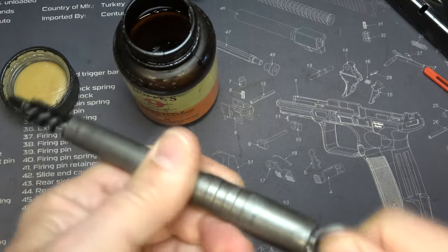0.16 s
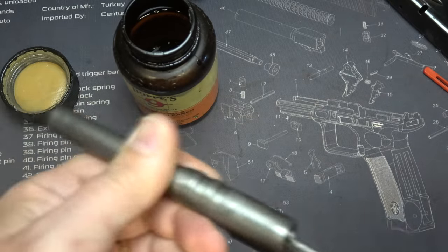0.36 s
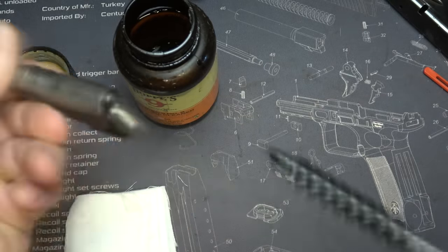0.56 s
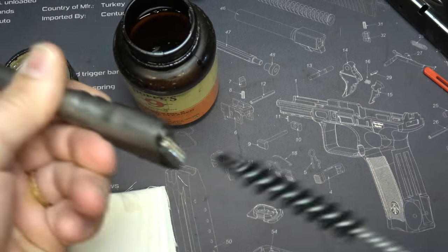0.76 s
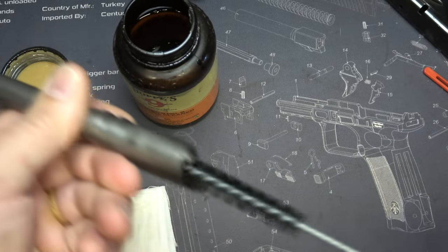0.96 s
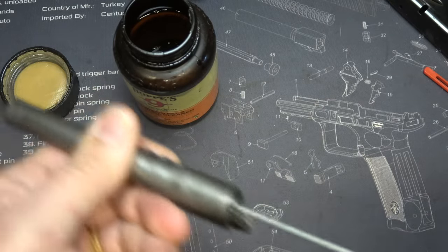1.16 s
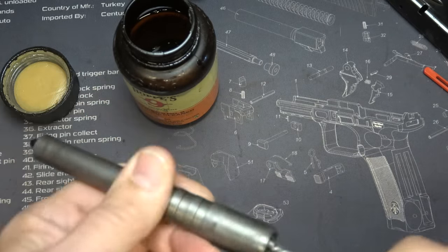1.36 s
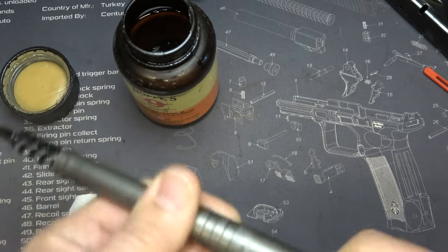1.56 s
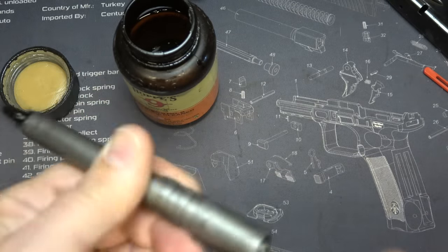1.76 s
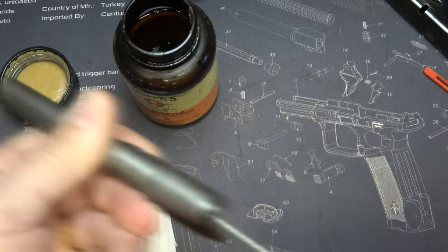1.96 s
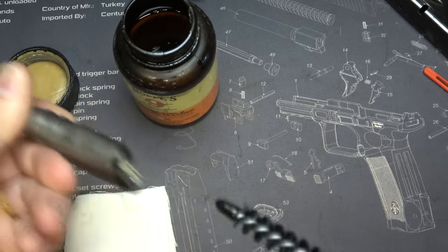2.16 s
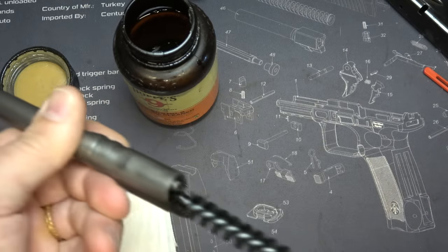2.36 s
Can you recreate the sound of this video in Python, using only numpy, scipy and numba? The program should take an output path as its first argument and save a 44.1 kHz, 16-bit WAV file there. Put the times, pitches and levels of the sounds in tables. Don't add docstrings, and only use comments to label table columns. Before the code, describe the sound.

A wet bristle brush scrubs inside a small steel tube, close and dry. Bright, gritty rasps with a hollow pipe tone come at 0.23 and 0.47 seconds, the second ending in a pop. A softer, slower push runs from 1.03 to 1.35, then a short hard knock at 1.5. A quick tug at 1.75 and longer pull from 1.9 end with a squeaky pop at 2.1. Quiet room hum remains.

```python
import sys
import numpy as np
from scipy import signal
from scipy.fft import rfft, irfft
from scipy.io import wavfile
from scipy.ndimage import uniform_filter1d
from numba import njit

SR = 44100
rng = np.random.default_rng(int(sys.argv[2]) if len(sys.argv) > 2 else 0)


def unload_audio(sound):
    columns = np.transpose(np.atleast_2d(sound))
    steps = np.round(np.clip(columns, -1, 1) * 32767)
    wavfile.write(sys.argv[1], SR, steps.astype(np.int16))


def attenuation_scalar(level_db):
    decades = np.asarray(level_db, float) / 20
    return 10 ** decades


N = 105840

# time_s, rubbing_db, air_drive_db, steel_lean_db
FIRST_PULL = [
    [(0.233, -24.5, -24, -6), (0.245, -21, -35, -9), (0.257, -25, -26, -7), (0.267, -24.5, -11, -2.5),
     (0.281, -22.5, -19.5, -12), (0.3, -26.5, -17, -7), (0.312, -29, -13.5, -4), (0.344, -31.5, -8, 0)],
    [(0.466, -32.5, -10.5, -31), (0.475, -29.5, -11.5, -21), (0.49, -27.5, -25, -7),
     (0.515, -26, -24.5, -14), (0.526, -24, -11, -22), (0.54, -21.5, -20, -18.5), (0.549, -19.5, -22, -26),
     (0.556, -24.5, -23.5, -19.5)],
]
PUSH = [
    [(1.034, -52, -19.5, -3), (1.098, -38, -27, -14), (1.12, -33.5, -31, -18), (1.15, -33.5, -23, -11),
     (1.2, -34.5, -6, -16), (1.243, -34, -22.5, -15), (1.255, -30.5, -26, -17), (1.322, -31, -25, -13.5),
     (1.352, -37.5, -12.5, -9.5)],
    [(1.485, -33, -0.5, -10), (1.509, -35, -28, -2.5), (1.527, -24, -15.5, 7.5), (1.537, -24.5, -4.5, 5),
     (1.547, -30, -1.5, 3)],
]
SECOND_PULL = [
    [(1.753, -31.5, -38, 6), (1.765, -23, -32, 5), (1.775, -23.5, -12, -16), (1.801, -29, -12, -2),
     (1.832, -28.5, -13.5, -19.5)],
    [(1.908, -31, -12.5, -18), (1.942, -27.5, -6, -4.5), (1.956, -25.5, -26, 0.5), (1.99, -26.5, -15, -4.5),
     (2.005, -29, -20, -21), (2.03, -27, -10.5, -29), (2.055, -29, -18, -29), (2.088, -22, -20.5, -27.5),
     (2.118, -41.5, -4, -4)],
]
STROKES = FIRST_PULL + PUSH + SECOND_PULL
GRIP_STARTS = [.232, .4655, 1.033, 1.4845, 1.752, 1.9075]
# quick_fall_db_per_s, rustle_start_db, rustle_fall_db_per_s
SETTLING = [(2500, -14, 497), (1570, -11, 447), (2000, -13, 491.5), (2070, -10, 451), (3500, -18.5, 293.5),
            (2030, -7.5, 452)]
# time_s, air_column_hz, second_mode_db, hiss_focus_db_per_octave,
# lowest_steel_mode_up_others_down_db
TRAVEL = [(.1, 1240, -2, -12.5, -2), (.23, 1340, 11, -1.5, -9), (.29, 1176, 1, -2, 0),
          (.31, 1310, -3, -4.5, 8), (.47, 1283, -13, -1, -5), (.51, 1380, -8, 4.5, 6),
          (.522, 1400, -8, 10, 7), (.546, 1386, -6, 6.5, -3.5), (.554, 1435, -16, -1, 0),
          (1.03, 1425, 15, 2, 6), (1.16, 1390, -3, 11.5, 2), (1.22, 1276, -12.5, 5.5, -7),
          (1.36, 1333, 5, 5, -8), (1.5, 1247, -17, 2, 4.5), (1.55, 1413, 2.5, -7.5, 4),
          (1.76, 1343, -1, -2.5, -6), (1.94, 1290, -5.5, 0.5, -7), (1.99, 1405, -8, 6.5, 6),
          (2.05, 1385, -6, 11, -17), (2.12, 1384, 4.5, -2.5, -2)]
# frequency_hz, density_db
BRISTLE_SPECTRUM = [(410, -37.5), (700, -16), (1250, -14.5), (1630, -8), (2520, -5), (8860, 3), (14300, -3),
                    (15900, -29.5), (16500, -44)]
# frequency_hz, level_db
LOW_STEEL = [(4490, -11.5), (4830, -9.5), (5010, -10.5)]
HIGH_STEEL = [(6240, -14), (6750, -14), (7400, -15), (7670, -12), (8580, -12), (9000, -11), (9550, -12),
              (10300, -13), (10900, -13), (11500, -15), (12200, -15), (13300, -17)]
# start_s, stop_s, frequency_hz, level_over_rubbing_db
SINGING = [(.233, 0.27, 8900, -11), (.233, .26, 2850, -14), (0.22, .285, 2520, -16),
           (.275, .305, 2100, -10), (.25, 0.26, 7300, -0.5), (0.47, 0.58, 2560, -15.5),
           (.535, 0.63, 2840, -15.5), (0.55, 0.51, 7400, -13.5), (1.034, 1.12, 3000, -14.5),
           (1.034, 1.09, 4650, -11), (1.1, 1.3, 2800, -19), (1.15, 1.28, 2500, -20),
           (0.25, .345, 4760, -10.5), (0.2375, 0.33, 5280, -8.5), (1.1, 1.2, 4650, -14.5),
           (1.24, 1.35, 5000, -15.5), (.5, .55, 1420, -21), (0.46, 0.5, 4900, -14.5),
           (1.105, 1.2, 9350, -3), (1.12, 1.24, 10400, -8.5), (0.98, 1.17, 6000, -16),
           (1.21, 1.3, 6000, -12), (1.25, 1.355, 9050, -7), (1.28, 0.98, 7440, -11),
           (1.752, 1.85, 5400, -6.5), (1.91, 1.94, 2040, -11), (1.94, 2.1, 2500, -21),
           (1.93, 1.96, 4100, -16), (1.968, 1.995, 5400, -8.5), (2.02, 2.06, 2550, -19),
           (1.9, 2.075, 3400, -11), (2.025, 2.1, 7000, -4.5), (1.93, 1.98, 8600, -12.5)]
# start_s, level_db, length_s
LONE_SLIPS = [(.002, -64, 0.037), (0.087, -60, 0.0082), (0.257, -26, .0012), (0.152, -64, 0.008),
              (0.184, -59, 0.0076), (.1995, -48.5, 0.0087), (0.212, -48.5, 0.01), (0.4299, -31.5, 0.0067),
              (0.442, -52.5, .018), (1.037, -62, 0.0038), (1.053, -47, 0.0051), (1.065, -50, 0.0036),
              (1.428, -38, 0.0039), (1.536, -25.5, 0.00065), (1.5436, -33, 0.00061), (1.544, -19, 0.00048),
              (1.687, -54.5, 0.031), (1.712, -42.5, 0.007)]
POPS = [(.559, 1450, .07), (.558, 2772, .036), (.558, 4242, .045), (2.103, 2795, .025), (2.118, 2795, .09),
        (2.112, 5700, .025), (1.5425, 1330, .014), (1.536, 1000, .035), (1.53, 850, .045),
        (1.536, 1400, .015), (1.352, 2100, .02), (1.35, 1000, .03), (1.429, 2080, .02), (1.429, 1400, .025),
        (2.385, 4550, .04), (.975, 4700, .05)]
POP_LEVELS = [-21, -32.5, -34, -21, -39, -29.5, -8.5, -23.5, -26.5, -20, -34.5, -37.5, -35.5, -33, -64, -66]
# start_s, level_db, pitch_hz
JOLTS = [(0.235, -34.5, 200), (.432, -39, 230), (.47, -32, 220), (1.54, -35, 531), (1.542, -36.5, 333),
         (1.546, -32, 110), (1.757, -39, 200), (1.913, -33.5, 359), (1.922, -31, 196)]
# middle_s, length_s,
# pitch_hz, level_db
SQUEAKS = [(1.276, 0.013, 729, -38.5), (1.317, 0.045, 400, -43.5), (1.318, 0.017, 838, -47),
           (2.114, 0.0087, 2795, -24.5)]
# frequency_hz, density_db
HUM_SPECTRUM = [(12, -36), (20, -2), (200, -4.5), (259, -10.5), (341, -10), (626, -11.5), (719, -9),
                (1250, -14), (1620, -53.5), (2750, -120)]
HISS_SPECTRUM = [(1000, 6.5), (2000, -3.5), (4500, -5.5), (16000, -10)]
# frequency_hz, correlation
LIKENESS = [(25, .999), (250, .86), (1500, .96), (5000, .68), (14000, .62)]
# frequency_hz, difference_db
LEFT_OVER_RIGHT = [(25, 0), (90, -2.0), (300, .5), (600, 1.2), (1500, -1.7), (4000, 0), (8000, .8),
                   (12000, -.8)]

SLIPS_PER_S, SLIP_SPREAD_DB, PATCHY_DB, FLUTTER_DB = 14000, 2.8, 1.3, .8
STEEL_WIDTH_HZ, STEEL_WANDER_DB = 130, 3.0
SINGING_WIDTH_HZ, SINGING_EDGE_S = 60, .004
COLUMN_WIDTH_HZ, SECOND_WIDTH_HZ, SECOND_RATIO = 75, 130, 1.958
LONE_SLIP_TONE_DB, JOLT_T60_S = -24, .055
ROOM_T60_S, ROOM_DB, WALL_CUT_HZ = .12, -28, 9000
HUM_DB, HUM_EDGE_HZ, HUM_EDGE_DB = -51.5, 1274, -66
RUMBLE_HZ, RUMBLE_DB, HISS_DB = 45.6, -57, -65.5


def brush():
    rub, press, air_db, lean_db = stroke_forces()
    lone = lone_slips()
    air_hz, second_db, focus_db, lower_db = in_time(TRAVEL)
    grains = slips()
    tips = grains[1, 1]
    hiss = (rub + lone) * banded(grains, BRISTLE_SPECTRUM, PATCHY_DB, focus_db)
    steel = steel_ring(tips, rub + lone, press, lean_db, lower_db) + singing(tips * press)
    blow = grains[1, 0] * (press * attenuation_scalar(air_db) + lone * attenuation_scalar(LONE_SLIP_TONE_DB))
    return hiss + steel + air_column(blow, air_hz, second_db)


def slips():
    size_db = SLIP_SPREAD_DB * np.minimum(rng.exponential(1, (4, N)), 5)
    sizes = attenuation_scalar(size_db) * rng.choice([-1, 1], (4, N))
    let_go = rng.random((4, N)) < SLIPS_PER_S / SR
    return rms_one(sizes * let_go).reshape(2, 2, N)


def stroke_forces():
    t = np.arange(N) / SR
    rows = []
    for start, stroke in zip(GRIP_STARTS, STROKES):
        rows.append((start, *stroke[0][1:]))
        rows += [row for row in stroke if row[0] > start]
    level_db, air_db, lean_db = in_time(rows)
    rub, press = np.zeros(N), np.zeros(N)
    for start, stroke, (quick, rustle_db, slow) in zip(GRIP_STARTS, STROKES, SETTLING):
        end, end_db = stroke[-1][:2]
        age = np.maximum(t - end, 0)
        moving = (t > start) * attenuation_scalar(level_db)
        settling = np.maximum(attenuation_scalar(-quick * age), attenuation_scalar(rustle_db - slow * age))
        rub += np.where(t < end, moving, attenuation_scalar(end_db) * settling)
        press += np.where(t < end, moving, attenuation_scalar(end_db - quick * age))
    flutter = attenuation_scalar(FLUTTER_DB * drift(70))
    rub = uniform_filter1d(rub, size=40) * flutter
    press = uniform_filter1d(press, size=40) * flutter
    return rub, press, air_db, lean_db


def lone_slips():
    t = np.arange(N) / SR
    return sum(attenuation_scalar(db) * (t > s) * np.exp(-((t - s) / length) ** 2) for s, db, length in LONE_SLIPS)


def steel_ring(tips, rub, press, lean_db, lower_db):
    ring = np.zeros(N)
    for k, (hz, db) in enumerate(LOW_STEEL):
        balance_db = lower_db if k == 0 else -lower_db
        push = tips * press * attenuation_scalar(lean_db + balance_db)
        ring += attenuation_scalar(db) * resonance(push, hz, STEEL_WIDTH_HZ / 2)
    for hz, db in HIGH_STEEL:
        push = tips * rub * attenuation_scalar(STEEL_WANDER_DB * drift(18))
        ring += attenuation_scalar(db) * resonance(push, hz, STEEL_WIDTH_HZ)
    return ring


def singing(push):
    t, song = np.arange(N) / SR, np.zeros(N)
    for start, stop, hz, db in SINGING:
        passing = np.clip(np.minimum(t - start, stop - t) / SINGING_EDGE_S, 0, 1)
        width_hz = SINGING_WIDTH_HZ * np.sqrt(hz / 2500)
        song += attenuation_scalar(db) * resonance(push * passing + 1e-18, hz, width_hz)
    return song


def air_column(blow, hz, second_db):
    first = resonance(blow, hz, COLUMN_WIDTH_HZ)
    second = resonance(blow * attenuation_scalar(second_db), SECOND_RATIO * hz, SECOND_WIDTH_HZ)
    return first - second


def pops_and_jolts():
    t, out = np.arange(N) / SR, np.zeros(N)
    pops = [(s, db, hz, t60) for (s, hz, t60), db in zip(POPS, POP_LEVELS)]
    jolts = [(*row, JOLT_T60_S) for row in JOLTS]
    for s, db, hz, t60 in pops + jolts:
        age = np.maximum(t - s, 0)
        onset = 1 - np.exp(-age * hz)
        out += attenuation_scalar(db - 60 * age / t60) * onset * np.sin(2 * np.pi * hz * age)
    return out


def squeaks():
    t, out = np.arange(N) / SR, np.zeros(N)
    for middle, length, hz, db in SQUEAKS:
        swell = np.exp(-((t - middle) * 2 / length) ** 2)
        out += attenuation_scalar(db) * swell * np.sin(2 * np.pi * hz * t)
    return out


def room(x):
    out, dull = np.zeros((2, N)), np.exp(-2 * np.pi * WALL_CUT_HZ / SR)
    lags = (rng.uniform(.006, .024, 16) * SR).astype(int)
    for k, lag in enumerate(lags):
        loop, state = x.copy(), [0.]
        gain = attenuation_scalar(-60 * lag / SR / ROOM_T60_S)
        for i in range(lag, N, lag):
            back, state = signal.lfilter([gain * (1 - dull)], [1, -dull], loop[i - lag:i], zi=state)
            loop[i:i + lag] += back[:N - i]
        out[k % 2] += (loop - x) * (-1) ** (k // 2)
    return out


def hum():
    air = attenuation_scalar(HUM_DB) * banded(rng.standard_normal((2, 2, N)), HUM_SPECTRUM, patchy_db=2.0)
    edge_band = signal.butter(2, [650, HUM_EDGE_HZ], "band", fs=SR, output="sos")
    murmur = rms_one(signal.sosfilt(edge_band, rng.standard_normal(N)))
    sharp_edge = signal.cheby1(6, 1, HUM_EDGE_HZ, fs=SR, output="sos")
    low = signal.sosfilt(sharp_edge, air + attenuation_scalar(HUM_EDGE_DB) * murmur)
    rumble = attenuation_scalar(RUMBLE_DB) * resonance(rng.standard_normal(N), RUMBLE_HZ, 12.0)
    hiss = attenuation_scalar(HISS_DB) * banded(rng.standard_normal((2, 2, N)), HISS_SPECTRUM, patchy_db=0.0)
    return low + rumble + hiss


def banded(white, spectrum, patchy_db, tilt_db=0):
    out, edges = 0, 20 * 2 ** np.arange(0, 10, 1 / 3)
    for k, (low, high) in enumerate(zip(edges, edges[1:])):
        hz = np.sqrt(low * high)
        if not spectrum[0][0] <= hz <= spectrum[-1][0]:
            continue
        source = white[k % 2]
        led_in = np.concatenate([source[:, -SR // 4:], source], axis=1)
        band = signal.butter(2, [low, high], "band", fs=SR, output="sos")
        mid, side = signal.sosfilt(band, led_in)[:, -N:]
        alike = at_hz(LIKENESS, hz)
        octaves = np.log2(min(hz, 1e8 / hz) / 7000)
        gain = attenuation_scalar(at_hz(spectrum, hz) + patchy_db * drift(25) + tilt_db * octaves)
        out = out + gain * (np.sqrt(1 + alike) * mid + np.sqrt(1 - alike) * side * [[1], [-1]])
    return rms_one(out)


def resonance(x, hz, width_hz):
    r = np.exp(-np.pi * width_hz / SR)
    return np.sqrt((1 - r * r) / 2) * glide(x, r, np.cos(2 * np.pi * hz / SR) * np.ones(N))


@njit
def glide(x, r, cosine):
    y = np.zeros(len(x))
    for i in range(2, len(x)):
        y[i] = x[i] - x[i - 2] + 2 * r * cosine[i] * y[i - 1] - r * r * y[i - 2]
    return y


def drift(rate_hz):
    r = np.exp(-2 * np.pi * rate_hz * 40 / SR)
    chance = rng.standard_normal(N // 40 + 2002)
    slow = signal.lfilter([1], [1, -2 * r, r * r], chance)[2000:]
    return np.interp(np.arange(N) / 40, np.arange(len(slow)), rms_one(slow))


def rms_one(x):
    return x / np.sqrt(np.mean(x ** 2) + 1e-20)


def in_time(rows):
    s, *columns = np.transpose(rows)
    return [np.interp(np.arange(N) / SR, s, c) for c in columns]


def at_hz(points, hz):
    table_hz, values = np.transpose(points)
    return np.interp(np.log(hz), np.log(table_hz), values)


def scene():
    near = brush() + pops_and_jolts() + squeaks()
    return near + attenuation_scalar(ROOM_DB) * room(near.mean(0)) + hum()


def low_pass(x):
    return signal.sosfilt(signal.butter(12, 16810, fs=SR, output="sos"), x)


def record(dry):
    hz = np.maximum(np.fft.rfftfreq(N, 1 / SR), 1)
    lean_db = at_hz(LEFT_OVER_RIGHT, hz) * [[.5], [-.5]]
    heard = irfft(rfft(dry) * attenuation_scalar(lean_db), N)
    top_cut = signal.ellip(8, .5, 30, 15800, fs=SR, output="sos")
    mix = signal.sosfilt(top_cut, heard)
    return low_pass(mix)


dry = scene()
out = record(dry)
unload_audio(out)
```